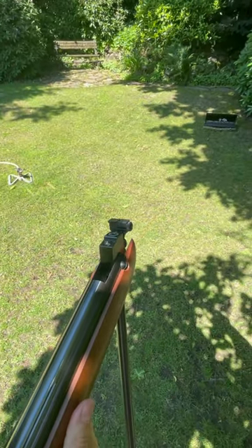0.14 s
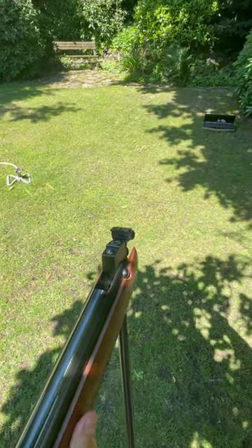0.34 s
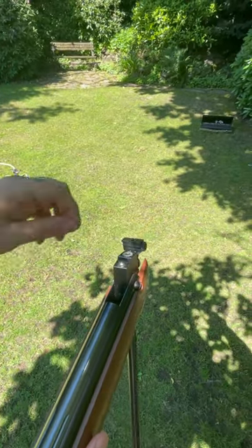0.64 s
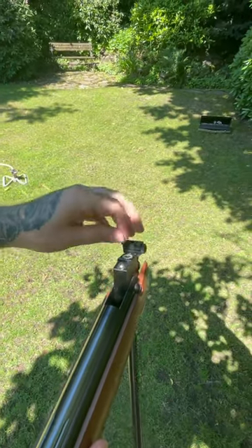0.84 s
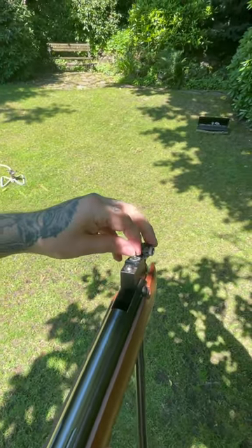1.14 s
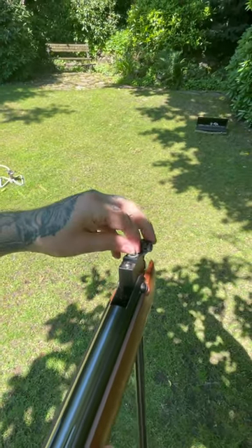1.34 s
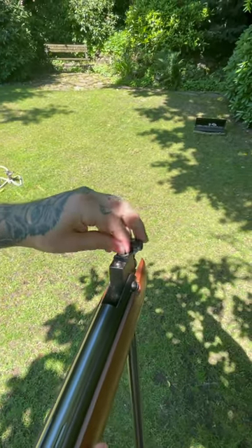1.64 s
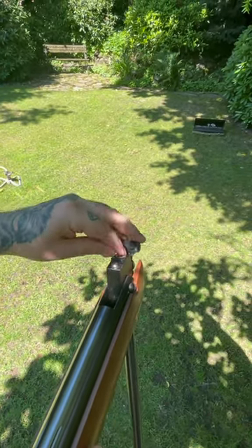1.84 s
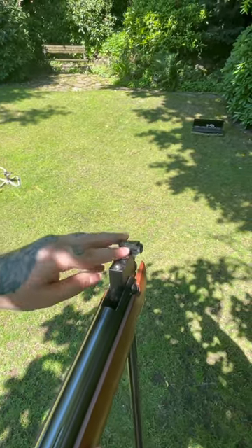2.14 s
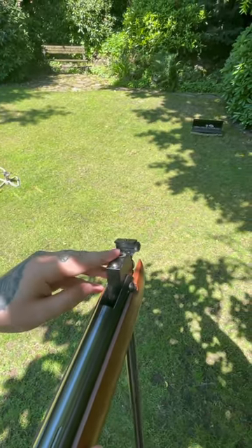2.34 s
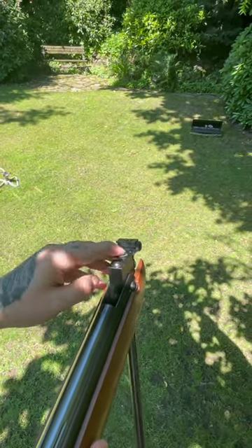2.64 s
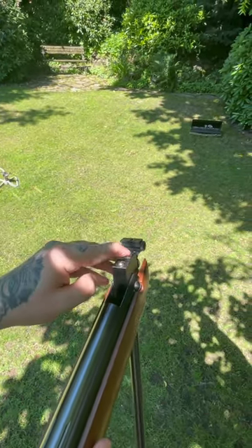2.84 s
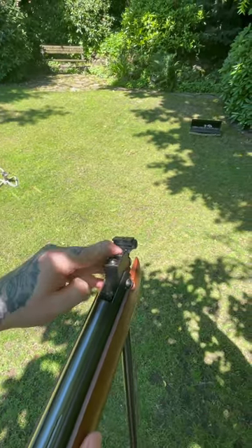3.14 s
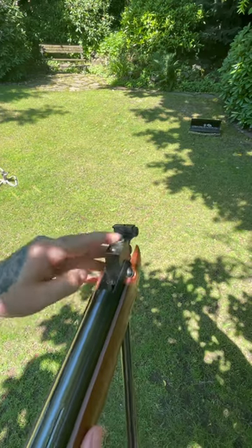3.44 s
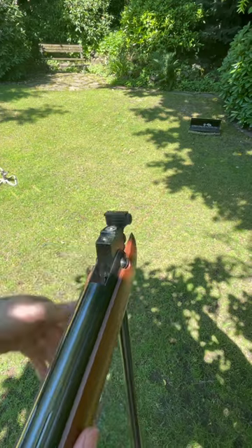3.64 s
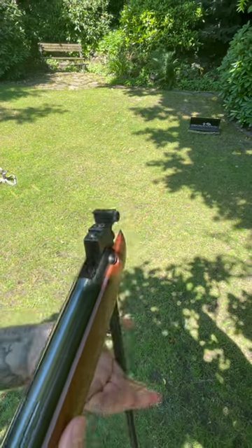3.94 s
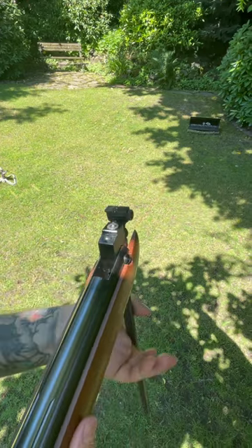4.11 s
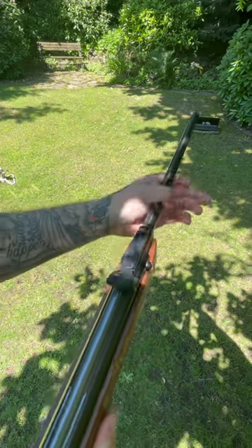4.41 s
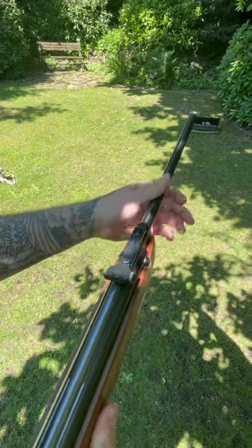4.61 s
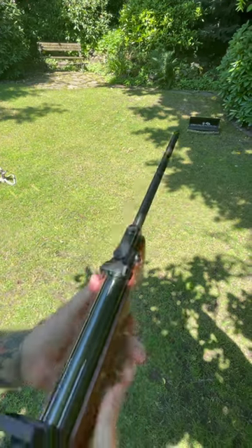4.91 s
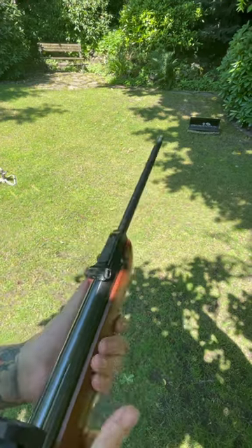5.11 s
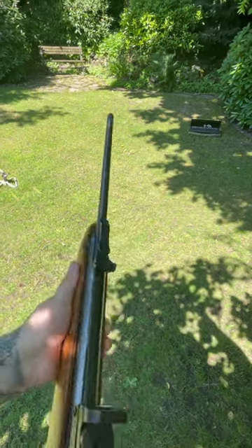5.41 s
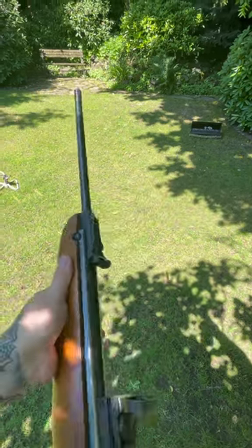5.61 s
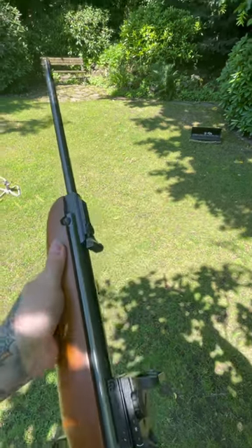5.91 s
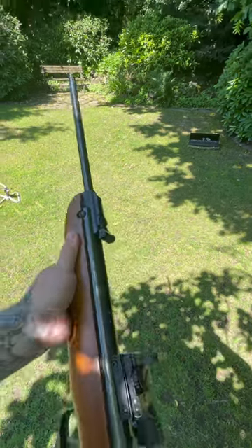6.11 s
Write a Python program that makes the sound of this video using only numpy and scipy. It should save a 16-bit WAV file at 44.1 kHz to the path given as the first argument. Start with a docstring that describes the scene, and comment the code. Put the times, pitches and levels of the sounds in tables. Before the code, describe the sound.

Sparrows and soft distant birdsong over faint garden air, then a steel hinge scrape, loud double clack, skin rubbing wood and a crisp metal snap.

```python
"""A break-barrel air rifle is loaded in a garden: hinge scrape, latch, breech slam, then a catch that snaps twice.
Steel parts are decaying noise bands plus tuned modes; hands are knocks, skin ticks, low bumps and gritty noise.
Sparrows, a blackbird, a dove and a distant chorus are gliding sines, partly blurred by diffuse tails.
Underneath lie coloured-noise air, a wavering low drone and a rumble."""
import sys
import numpy as np
from scipy import signal
from scipy.fft import rfft, irfft, next_fast_len
from scipy.io import wavfile
from scipy.ndimage import uniform_filter1d

SR = 44100
rng = np.random.default_rng(int(sys.argv[2]) if len(sys.argv) > 2 else 0)


def bounce(signal):
    """Save signal as a 16-bit WAV file at the path given by the first command-line argument."""
    frames = np.transpose(np.atleast_2d(signal))
    limited = np.clip(frames, -1, 1)
    pcm = np.round(limited * 32767).astype(np.int16)
    wavfile.write(sys.argv[1], SR, pcm)


N = 276065
TIME_S = np.arange(N) / SR
TOP_HZ = 16300

# Levels in all tables are ahead of the gains applied in the functions.
# Garden air swell: (time [s], level [dB])
AIR_SWELL = [(0.0, -70), (3.84, -74), (4.04, -74), (4.25, -70), (4.55, -74), (4.99, -75), (5.25, -70),
             (6.26, -71)]
# Garden air spectrum: (frequency [Hz], gain [dB])
AIR_COLOUR = [(20, -32), (35, -11), (60, 0), (110, -9), (170, -15), (280, -15), (450, -20), (950, -21),
              (1400, -29), (2200, -32), (3500, -35), (6000, -44), (8000, -54), (14000, -57), (16000, -66)]
# Low drone: (time [s], frequency [Hz], level [dB])
DRONE = [(0.0, 50.4, -62), (.35, 50, -63), (.62, 49.5, -57), (0.98, 53, -60), (1.1, 62.7, -61),
         (2.39, 57.1, -68), (2.47, 60, -64), (3.56, 58, -68), (4.41, 82, -54), (4.93, 78, -55),
         (5.02, 64, -52), (5.42, 66, -50.5), (5.53, 77, -50.5), (5.68, 66.5, -57), (6.26, 66.4, -64)]
# Rumble of hands and air on the microphone: (time [s], level [dB])
RUMBLE_SWELL = [(0, -72), (1.1, -64), (1.5, -64), (2.2, -73), (2.7, -66), (3.2, -63), (3.7, -68),
                (4.1, -60), (4.6, -54), (5.3, -55), (5.7, -58), (6.26, -66)]
# Rumble spectrum: (frequency [Hz], gain [dB])
RUMBLE_COLOUR = [(20, -36), (32, -11), (48, 0), (80, -3), (125, -8), (180, -16), (260, -18), (420, -32),
                 (1000, -55), (4000, -80)]

# Distant chorus: time span, pitch range, mean level
CHORUS_START_S, CHORUS_END_S = .6, 1.7
CHORUS_LOW_HZ, CHORUS_HIGH_HZ, CHORUS_DB = 1850, 5000, -73
# Dove coos: (time [s], length [s], start pitch [Hz], end pitch [Hz], level [dB])
DOVE_COOS = [(.1, .11, 450, 450, -65), (.8, .32, 560, 525, -67), (1.81, .28, 533, 530, -70),
             (2.14, .16, 528, 535, -63), (2.3, .15, 540, 515, -63)]
# Blackbird notes: (time [s], length [s], start pitch [Hz], end pitch [Hz], level [dB])
BLACKBIRD_NOTES = [(.78, .07, 2250, 2450, -69), (.96, .12, 2300, 2100, -72), (1.2, .14, 2100, 2150, -69),
                   (1.61, .13, 1850, 1980, -65), (1.815, .1, 2500, 2680, -59.5),
                   (1.9, .12, 2680, 2930, -62), (2.07, .11, 1880, 1900, -65),
                   (2.18, .08, 1950, 2150, -64.5), (2.465, .06, 2980, 2620, -65),
                   (2.54, .08, 2650, 2920, -67), (3.23, .07, 2250, 2300, -75), (3.36, .06, 2050, 2030, -75),
                   (3.46, .08, 2370, 2380, -72)]
# One thin arched call: (time [s], length [s], start pitch [Hz], end pitch [Hz], level [dB])
THIN_CALL = (6.106, .082, 7950, 7650, -58)
# Low harsh chups from bushes: (time [s], length [s], start pitch [Hz], end pitch [Hz], level [dB])
CHUPS = [(2.61, .05, 3700, 3900, -71), (4.55, .05, 3000, 3400, -63), (4.685, .055, 3100, 3450, -62)]
# Far sparrow cheeps: (time [s], length [s], lower voice [Hz], its level [dB],
# upper voice [Hz], its level [dB])
FAR_CALLS = [(.565, .08, 5150, -66, 6100, -76), (.795, .07, 4900, -64, 6000, -67),
             (1.02, .06, 4450, -69, 6200, -68), (1.25, .06, 4350, -66, 5900, -62),
             (1.31, .05, 4400, -72, 6200, -66), (1.455, .07, 4800, -67, 6100, -70),
             (1.545, .06, 4500, -67, 6200, -66), (1.62, .07, 4700, -65, 6000, -63),
             (1.815, .08, 5100, -66, 6300, -66), (3.64, .06, 5000, -68, 5900, -63),
             (3.838, .06, 4300, -62, 5850, -65), (4.785, .07, 5100, -65, 6200, -69),
             (4.83, .04, 4600, -69, 6250, -60), (4.995, .07, 5050, -60, 6200, -69),
             (5.08, .04, 4600, -68, 6150, -60), (5.36, .05, 4800, -68, 5500, -63),
             (5.51, .06, 4950, -63, 6000, -62), (5.775, .07, 4950, -62, 6050, -64),
             (6.02, .06, 4750, -58, 5950, -62)]
UNDERTONE_HZ, UNDERTONE_DB = 2250, -8  # level against the lower voice's table level
# Near sparrow chirp contour: (delay [s], pitch [Hz], level [dB])
CHIRP_CONTOUR = [(0, 4450, -28), (.021, 4750, -10), (.025, 5800, -20), (.027, 3800, -24), (.030, 4000, -6),
                 (.038, 4350, 0), (.044, 5150, 3), (.048, 3950, -4), (.067, 3720, -6), (.078, 3600, -28),
                 (.089, 3250, -17), (.103, 3550, -4), (.108, 4000, 0), (.114, 3450, -3), (.128, 3300, -9),
                 (.138, 2900, -28)]
# Near sparrow calls: (time [s], level [dB], time stretch [ratio], second peak re first [dB])
NEAR_CALLS = [(.398, -45.5, 1, -1), (1.066, -45, 1.03, -3), (1.674, -48.5, 1.07, -2), (2.251, -46, 1.02, 0),
              (3.598, -46.5, .98, -5), (5.311, -44, 1, 0)]
NOTE_ATTACK, NOTE_RELEASE = .25, .35  # shares of a note's length

# Finger bumps: (time [s], level [dB], frequency [Hz])
BUMPS = [(1.352, -31, 62), (1.374, -31, 105), (1.475, -37, 70), (1.54, -39, 65), (1.65, -37, 80),
         (2.055, -41, 75), (2.37, -43, 60), (2.63, -43, 70), (2.85, -47, 100), (3.395, -41, 60),
         (3.615, -36, 65), (4.005, -40, 75), (4.043, -32, 100), (4.61, -42, 110), (4.69, -42, 100),
         (4.77, -43, 95), (5.005, -39, 62), (5.32, -35, 68), (5.415, -35, 72), (5.56, -40, 75)]
# Dull knocks of a hand grabbing the barrel:
# (time [s], level [dB], contact [ms], ring t60 at 1 kHz [s])
KNOCKS = [(3.9925, -59.5, 2, .03), (4.0095, -62, 2, .03), (4.0182, -45.5, 2.4, .03), (5.9690, -54, 2, .03)]
# Knock spectrum: (frequency [Hz], gain [dB])
KNOCK_COLOUR = [(300, -4), (750, 1), (1100, -4), (1650, 2), (2400, -6), (3400, -7), (4700, 2), (6300, -15),
                (8300, -10), (11000, -22), (16000, -34)]
# Barrel modes under the hand's knock: (frequency [Hz], level re knock [dB], t60 [s])
KNOCK_MODES = [(785, -7, .07), (1600, -7, .04), (4600, -5, .035)]
# Bright thin ticks, mostly skin creaking on the wooden stock, with one faint pellet tick:
# (time [s], level [dB], contact [ms], ring t60 at 1 kHz [s])
TICKS = [(1.738, -78, 1, .015), (4.5522, -68, 1, .02), (4.594, -73, 1, .02), (5.0420, -62, 2, .02),
         (5.0920, -55, 5, .03), (5.2450, -54, 3, .02), (5.2705, -56, 3, .02), (5.3340, -56, 2, .03),
         (5.5675, -52, 2, .015)]
# Tick spectrum: (frequency [Hz], gain [dB])
TICK_COLOUR = [(400, -9), (900, -9), (1600, -10), (3000, -8), (4800, -1), (5900, 0), (7500, -11),
               (11000, -13), (16000, -20)]
# Palm strokes on the stock: (time [s], length [s], level [dB])
STROKES = [(3.96, .22, -81), (4.765, .04, -71), (4.98, .1, -75), (5.08, .2, -67.5), (5.32, .05, -71),
           (5.5, .07, -74), (5.78, .25, -75), (6.16, .1, -77)]
STROKE_ATTACK_S, STROKE_RELEASE_T60_S = .045, .5
# Palm rub spectrum: (frequency [Hz], gain [dB])
RUB_COLOUR = [(35, 20), (70, 20), (150, 13), (400, 10), (750, 8), (1200, 3), (2000, 4), (3000, 2),
              (5500, 5), (8000, -4), (12000, -3), (16000, -8)]
# Rasp of the tightening grip: (time [s], length [s], level [dB])
RASP = (5.333, .027, -50.5)
# Rasp spectrum: (frequency [Hz], gain [dB])
RASP_COLOUR = [(400, -6), (1400, -12), (1950, 4), (2600, -8), (3800, -7), (4800, -1), (5800, 1),
               (7500, -16), (15000, -21)]

# Catch snaps and returns: (time [s], level [dB], contact [ms], ring t60 at 1 kHz [s])
CATCH_BLOWS = [(5.8855, -18.3, 1.9, .019), (5.8925, -39, 2, .018), (5.9903, -52, 1.2, .012),
               (6.0058, -30, 1.6, .014)]
# Catch spectrum: (frequency [Hz], gain [dB])
CATCH_COLOUR = [(400, -36), (800, -29), (1200, -5), (2000, -6), (3200, -1.5), (4200, -1), (5200, -10),
                (6400, -1), (7800, -5), (9000, -2), (11500, -5), (15500, -17)]
# Catch modes: (frequency [Hz], level [dB], t60 [s])
CATCH_MODES = [(1184, -29, .06), (1744, -41, .09), (3400, -27, .03), (4300, -28, .025), (5959, -35, .08),
               (8750, -15.5, .013), (11300, -30, .022)]
# Hinge slips: (time [s], level [dB], contact [ms], ring t60 at 1 kHz [s])
SLIPS = [(4.2032, -34.5, 2, .02), (4.2145, -35, 3, .035), (4.2220, -37, 3, .04), (4.2330, -38, 3, .04),
         (4.2388, -32.5, 2.6, .025), (4.2470, -28, 1.4, .03), (4.2576, -36, 1.5, .025),
         (4.2606, -33, 2.5, .025)]
# Hinge spectrum: (frequency [Hz], gain [dB])
HINGE_COLOUR = [(300, -16), (500, -8), (850, 0), (1200, -6), (1700, -5), (2300, -6), (3700, 0), (5000, -3),
                (6500, 0), (8500, -8), (11000, -9), (14000, -19), (15500, -23)]
# Latch blows: (time [s], level [dB], contact [ms], ring t60 at 1 kHz [s])
LATCH_BLOWS = [(4.2906, -17.8, 1.5, .022), (4.2932, -21, 1.2, .026)]
# Latch spectrum: (frequency [Hz], gain [dB])
LATCH_COLOUR = [(200, -13), (350, -17), (580, -16), (780, 3), (1000, -12), (1500, -3.5), (2100, -16),
                (2700, -7), (3900, -4.5), (5000, -11), (6300, -4), (8000, -10), (10500, -10), (13000, -24),
                (15500, -30)]
# Latch modes: (frequency [Hz], level [dB], t60 [s])
LATCH_MODES = [(10470, -34, .045), (3950, -22, .018)]
# Breech slam, one row: (time [s], level [dB], contact [ms], ring t60 at 1 kHz [s])
SHUT_BLOW = (4.3234, -17.2, 1.8, .026)
# Breech slam spectrum: (frequency [Hz], gain [dB])
SHUT_COLOUR = [(150, -2), (300, -6), (500, -3), (630, -6), (780, 0), (1000, -8), (1300, 1.5), (1700, -2.5),
               (2100, -9), (2600, -4), (3200, -6), (4000, -4), (5000, -7), (6500, -3), (8000, -7),
               (10000, -11), (13000, -22), (15500, -20)]
# Barrel and action modes: (frequency [Hz], level [dB], t60 [s])
BARREL_MODES = [(785, -21.5, .07), (1055, -35, .05), (1285, -26, .035), (1500, -29, .045), (1670, -28, .04),
                (2783, -27, .03), (3780, -27, .05), (4683, -30, .035), (5700, -33, .045), (6880, -30, .03)]
# Wooden stock modes: (frequency [Hz], level [dB], t60 [s])
STOCK_MODES = [(205, -20, .13), (160, -21, .055), (115, -23, .06), (75, -29, .07), (480, -24, .025)]
# Lag of the left port behind the right for the rifle: (frequency [Hz], phase [rad])
RIFLE_LAG = [(0, 0), (300, .1), (800, .8), (1700, 1.2), (3800, .8), (6000, 1.8), (8000, 3.2), (10000, 4.6),
             (12000, 6), (14000, 7), (16000, 8.6)]


def undb(db):
    """Decibels to gain."""
    return 10 ** (np.asarray(db) / 20)


def unit(x):
    """Scale to rms 1."""
    return x / np.sqrt(np.mean(x ** 2) + 1e-30)


def curve(rows, column=1):
    """Interpolate a table column linearly over time."""
    rows = np.array(rows)
    return np.interp(TIME_S, rows[:, 0], rows[:, column])


def colour_at(colour, hz):
    """Gain of a (Hz, dB) spectrum, interpolated over log frequency."""
    colour_hz, db = np.transpose(colour)
    return undb(np.interp(np.log(hz + 1), np.log(colour_hz), db))


def tint(x, colour):
    """Filter by a (Hz, dB) spectrum."""
    size = next_fast_len(x.shape[-1])
    gain = colour_at(colour, np.fft.rfftfreq(size, 1 / SR))
    return irfft(rfft(x, size) * gain, size)[..., :x.shape[-1]]


def wander(rate_hz):
    """Smoothed random steps, rms near 1."""
    hold = max(int(SR / rate_hz), 1)
    steps = np.repeat(rng.standard_normal(N // hold + 1), hold)
    return unit(uniform_filter1d(steps, hold)[:N])


def fade(t_s, t60_s):
    """Exponential decay, 60 dB per t60; flat before zero."""
    return np.exp(-np.log(1000) * np.maximum(t_s, 0) / t60_s)


def add(out, start_s, x):
    """Mix a sound in at a time."""
    i = int(start_s * SR)
    out[..., i:i + x.shape[-1]] += x[..., :N - i]


def pair(size, likeness):
    """Left and right noise with a given correlation."""
    c = np.clip(likeness, -.99, .99)
    mid, side = rng.standard_normal((2, size))
    sides = side * np.array([[1], [-1]])
    return (np.sqrt(1 + c) * mid + np.sqrt(1 - c) * sides) / np.sqrt(2)


def pan(left_minus_right_db):
    """Channel gains for a level difference."""
    return undb(np.array([[left_minus_right_db], [-left_minus_right_db]]) / 2)


def ports(x, lag):
    """Shift the left port by a (Hz, rad) phase lag; a negative lag leads the right port."""
    size = next_fast_len(N + 64)
    lag_rad = np.interp(np.fft.rfftfreq(size, 1 / SR), *np.transpose(lag))
    left = irfft(rfft(x[0], size) * np.exp(-1j * lag_rad), size)
    return np.stack([left[:N], x[-1]])


def scatter(x, t60_s, onset_s, colour):
    """Diffuse reflections: convolve with decaying coloured noise, unrelated left and right."""
    t = np.arange(SR) / SR
    response = tint(rng.standard_normal((2, SR)), colour) * fade(t, t60_s) * (1 - np.exp(-t / onset_s))
    response = unit(response) / np.sqrt(SR)
    return signal.fftconvolve(np.atleast_2d(x), response, axes=-1)[:, :N]


def garden(air_db=13.1, drone_db=3.5, throb=.4, wander_db=1.6):
    """Air and far traffic as noise with wandering octave bands, over a throbbing drone and a rumble."""
    noise = tint(pair(N, .15), AIR_COLOUR)
    lowpassed = [noise]
    for cutoff_hz in (2800, 1400, 700, 350, 175):
        sos = signal.butter(4, cutoff_hz, fs=SR, output="sos")
        lowpassed.append(signal.sosfiltfilt(sos, noise))
    lowpassed.append(0)
    # neighbouring low-passes subtract to bands
    bands = sum((upper - lower) * undb(wander_db * wander(9))
                for upper, lower in zip(lowpassed, lowpassed[1:]))
    air = unit(bands) * undb(curve(AIR_SWELL) + air_db + .6 * wander(3))

    phase = 2 * np.pi * np.cumsum(curve(DRONE)) / SR
    sway = 1 + throb * (wander(16) + 1j * wander(16))  # amplitude and phase
    port_phase = np.array([[0], [1.3]])
    drone = unit(np.real(sway * np.exp(1j * (phase + port_phase))))
    drone = drone * undb(curve(DRONE, column=2) + drone_db)

    rumble = unit(tint(pair(N, .4), RUMBLE_COLOUR)) * undb(curve(RUMBLE_SWELL) + 2 * wander(12))
    return air + drone + rumble


def whistle(notes, arch=0, waver=.01, waver_hz=150, flutter_db=2.5, size=128):
    """Near-sine bird voice: notes swell, hold and fade; pitch glides, arches and wavers."""
    out = np.zeros(N)
    for start_s, length_s, from_hz, to_hz, db in notes:
        along = np.linspace(0, 1, int(length_s * SR))
        wobble, flutter = (np.interp(along * length_s * waver_hz, np.arange(size), row)
                           for row in rng.standard_normal((2, size)))
        glide_hz = from_hz + (to_hz - from_hz) * along
        hz = glide_hz * (1 + arch * np.sin(np.pi * along) + waver * wobble)
        swell = np.clip(np.minimum(along / NOTE_ATTACK, (1 - along) / NOTE_RELEASE), 0, 1)
        tone = np.sin(2 * np.pi * np.cumsum(hz) / SR)
        add(out, start_s, tone * swell * undb(db + flutter_db * flutter))
    return out


def chorus(count=22):
    """Distant birds: short random whistles, overlapping."""
    when, height, slope, length, loud = rng.random((count, 5)).T
    start_s = np.interp(when, (0, 1), (CHORUS_START_S, CHORUS_END_S))
    hz = CHORUS_LOW_HZ * (CHORUS_HIGH_HZ / CHORUS_LOW_HZ) ** height
    end_hz = hz * (.92 + .16 * slope)
    notes = zip(start_s, .04 + .06 * length, hz, end_hz, CHORUS_DB + 6 * (loud - .5))
    return whistle(notes, arch=.04, waver=.025, waver_hz=250, flutter_db=4)


def cheeps(upper_late_s=.012):
    """Far sparrows: two rough voices, the lower harsher, over a weak undertone."""
    lower, upper, under = [], [], []
    for s, length_s, low_hz, low_db, high_hz, high_db in FAR_CALLS:
        lower.append((s, length_s, low_hz * .97, low_hz * 1.02, low_db))
        upper.append((s + upper_late_s, length_s, high_hz * .98, high_hz, high_db - 1))
        under.append((s, length_s, UNDERTONE_HZ, UNDERTONE_HZ, low_db + UNDERTONE_DB))
    return (whistle(lower, arch=.02, waver=.07, waver_hz=600, flutter_db=4.5)
            + whistle(under, arch=.02, waver=.05, waver_hz=400, flutter_db=4)
            + whistle(upper, arch=0, waver=.026, waver_hz=500, flutter_db=4.5))


def chirps(second_peak_s=.08, waver=.011, flutter_db=2.5):
    """Near sparrow: a slightly hoarse whistle whipped through two sharp pitch peaks."""
    out = np.zeros(N)
    delay_s, contour_hz, contour_db = np.transpose(CHIRP_CONTOUR)
    for start_s, db, stretch, second_db in NEAR_CALLS:
        t = TIME_S[:int(delay_s[-1] * stretch * SR)] / stretch
        hz = np.interp(t, delay_s, contour_hz) * (1 + waver * wander(900)[:len(t)])
        level_db = db + np.interp(t, delay_s, contour_db) + second_db * (t > second_peak_s)
        level_db = level_db + flutter_db * wander(300)[:len(t)]
        add(out, start_s, np.sin(2 * np.pi * np.cumsum(hz) / SR) * undb(level_db))
    return out


def birds():
    """Mix the bird voices: direct sound, short tail from leaves, long tails from hedges and trees."""
    near, far = chirps(), cheeps()
    chups = whistle(CHUPS, arch=.08, waver=.13, waver_hz=800, flutter_db=3)
    song = whistle(BLACKBIRD_NOTES, arch=.01, waver=.022, waver_hz=260, flutter_db=3.5)
    dove = whistle(DOVE_COOS, arch=0, waver=.04, waver_hz=110, flutter_db=3)
    thin = whistle([THIN_CALL], arch=.06, waver=.012, waver_hz=300, flutter_db=2.5)

    direct = ports([near], [(0, 0), (8000, -5.8)]) * pan(-2) + thin * pan(3.5)
    direct = direct + undb(-6) * song + undb(-9) * dove
    leaves = scatter(undb(-13) * near + undb(-3) * far + chups, .11, .003,
                     [(500, 0), (6000, 0), (12000, -6)])
    send = undb(-12.5) * near + undb(-3.5) * far + undb(-9) * chups + dove + undb(-10) * thin + chorus()
    hedges = scatter(send, .65, .012,
                     [(500, 0), (2300, -1), (3400, 3), (4500, 0), (6000, -2.5), (12000, -4)])
    trees = scatter(song, .65, .012, [(3000, 0), (12000, -4)])
    return direct + leaves + hedges + undb(-4) * trees


def blow(row, colour, lows_late_s=.0012, ring_slope=.45, likeness=.88, size=4096):
    """Impact: third-octave noise holds for the contact, then decays, highs fastest."""
    _, db, contact_ms, t60_s = row
    t = np.arange(size) / SR
    hz = 160 * 2 ** (np.arange(21)[:, None, None] / 3)
    window = np.exp(-(4 * np.log2((np.fft.rfftfreq(size, 1 / SR) + 1) / hz)) ** 2)
    noise = np.array([pair(size, likeness ** min(f / 1000, 1)) for f in hz.flat])
    bands = irfft(rfft(noise) * window)
    rise = 1 - np.exp(-(t / (lows_late_s * (1000 / hz) ** .35)) ** 2)
    bands = bands * rise * fade(t - contact_ms / 1000, t60_s * (1000 / hz) ** ring_slope)
    bands = bands / bands.std(axis=(1, 2), keepdims=True)
    burst = unit(np.sum(bands * colour_at(colour, hz) * np.sqrt(hz), axis=0))
    return burst * undb(db) * np.sqrt(SR / 100 / size)  # level: total energy as rms over 10 ms


def blows(rows, colour):
    """A series of impacts of one colour."""
    out = np.zeros((2, N))
    for row in rows:
        add(out, row[0], blow(row, colour))
    return out


def ring(modes, push_s, spread_rad):
    """Decaying modes of alternating sign, eased in by a push; random phase per port."""
    t = np.arange(SR // 2) / SR
    tones = np.zeros((2, len(t)))
    for k, (hz, db, t60_s) in enumerate(modes):
        phase = 2 * np.pi * hz * t + spread_rad * rng.standard_normal((2, 1))
        tones += (-1) ** k * undb(db) * fade(t, t60_s) * np.sin(phase)
    return tones * (1 - np.exp(-t / push_s))


def grit(rate_hz, spread_db):
    """Skin stick-slip: dense random clicks of uneven size."""
    chance, size = rng.random(N), rng.standard_normal(N)
    return (chance < rate_hz / SR) * np.sign(size) * undb(spread_db * np.minimum(abs(size), 2))


def palm(rub_db=7.5, grain_db=-4.5, uneven_db=2.4):
    """Palm on wood: noise and grit slide in uneven strokes, with one short rasp of the grip."""
    grip = np.zeros(N)
    for start_s, length_s, db in STROKES:
        attack = np.clip((TIME_S - start_s) / STROKE_ATTACK_S, 0, 1)
        grip += undb(db) * attack * fade(TIME_S - start_s - length_s, STROKE_RELEASE_T60_S)
    friction = pair(N, .45) + undb(grain_db) * unit(grit(700, 7))
    unevenness = undb(rub_db + uneven_db * wander(45) + 1.5 * wander(250))
    rub = unit(tint(friction, RUB_COLOUR)) * grip * unevenness

    start_s, length_s, db = RASP
    rasp = unit(tint(grit(1100, 4) + .3 * pair(N, .2), RASP_COLOUR)) * undb(db)
    attack = np.clip((TIME_S - start_s) / .002, 0, 1)
    return rub + rasp * attack * fade(TIME_S - start_s - length_s, .03)


def hands(bump_t60_s=.1, bump_pan_db=2.5):
    """Barrel knocks under the hand (noise plus modes), skin ticks (noise), low finger bumps, palm rub."""
    out = blows(KNOCKS, KNOCK_COLOUR) + blows(TICKS, TICK_COLOUR)
    for start_s, db, _, _ in KNOCKS:
        add(out, start_s, ring(KNOCK_MODES, .001, .4) * undb(db))
    for start_s, db, hz in BUMPS:
        modes = [(hz, db, bump_t60_s), (hz * .6, db - 4, bump_t60_s), (hz * 2.1, db - 12, bump_t60_s)]
        add(out, start_s, ring(modes, .005, .5) * pan(bump_pan_db))
    return out + palm()


def catch(rebound_tilt_db_per_octave=5.5, rebound_ring_db=-5):
    """A sprung steel part snaps and rings; later blows are thinner and ring less."""
    thin = [(hz, db + rebound_tilt_db_per_octave * np.log2(min(hz, 3600))) for hz, db in CATCH_COLOUR]
    out = blows(CATCH_BLOWS[:1], CATCH_COLOUR) + blows(CATCH_BLOWS[1:], thin)
    for k, (start_s, db, _, _) in enumerate(CATCH_BLOWS):
        ring_db = db - CATCH_BLOWS[0][1] + (rebound_ring_db if k else 0)
        add(out, start_s, ring(CATCH_MODES, .0008, .3) * undb(ring_db))
    return out * pan(.8)


def sliding(colour, start_s, end_s):
    """Steel sliding on steel: coloured noise gated with 5 ms ramps."""
    gate = uniform_filter1d(1. * ((TIME_S > start_s) & (TIME_S < end_s)), SR // 200)
    return unit(tint(pair(N, .6), colour)) * gate


def barrel(scrape_db=-39.5, ride_db=-45, start_s=4.203, end_s=4.266, stock_s=4.329):
    """Hinge scrapes in slips, latch rides up its ramp and snaps, breech slams, stock shudders."""
    scrape = sliding(HINGE_COLOUR, start_s, end_s) * undb(scrape_db + 3.5 * wander(350))
    groan_colour = [(300, -26), (600, -16), (800, 3), (1100, -14), (1700, -18),
                    (3500, -12), (5500, -14), (9000, -28), (15000, -42)]
    latch_s = LATCH_BLOWS[0][0]
    groan = sliding(groan_colour, end_s, latch_s) * undb(ride_db)
    out = blows(LATCH_BLOWS, LATCH_COLOUR) + blows([SHUT_BLOW], SHUT_COLOUR)
    for s, db, _, _ in [LATCH_BLOWS[0], SHUT_BLOW] + list(SLIPS):
        add(out, s, ring(BARREL_MODES, .001, .5) * undb(db - SHUT_BLOW[1]))
    add(out, stock_s, ring(STOCK_MODES, .003, .1))
    add(out, latch_s, ring(LATCH_MODES, .001, .3))
    return out * pan(1.3) + scrape + groan + blows(SLIPS, HINGE_COLOUR)


def scene(early_db=-25, late_db=-34):
    """Rifle, its quick return from ground and house wall, its longer one from trees, birds, garden."""
    rifle = ports(barrel() + catch() + hands(), RIFLE_LAG)
    early = scatter(rifle, .17, .004, [(150, -6), (700, 0), (2300, 1), (5000, -4),
                                       (7000, -5), (9000, -9), (16000, -11)])
    late = scatter(rifle, .5, .02, [(150, -6), (1000, -1), (2200, 3), (4000, -5),
                                    (7000, -6), (9000, -15), (16000, -21)])
    return rifle + undb(early_db) * early + undb(late_db) * late + birds() + garden()


def record(dry):
    """Steep elliptic low-pass at TOP_HZ."""
    return signal.sosfilt(signal.ellip(8, .2, 70, TOP_HZ, fs=SR, output="sos"), dry)


dry = scene()
out = record(dry)
bounce(out)
```